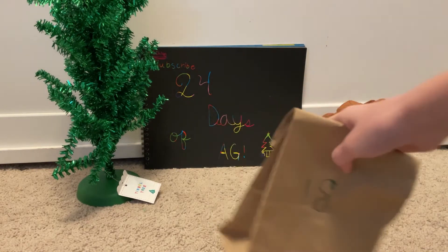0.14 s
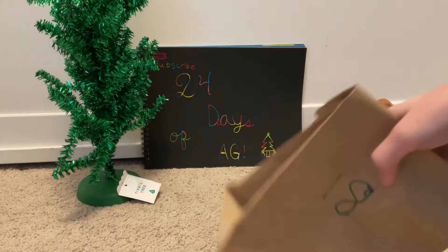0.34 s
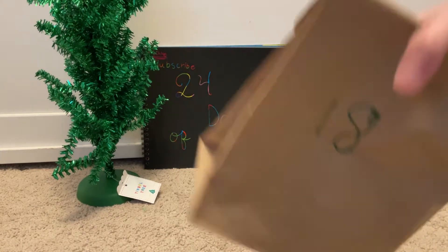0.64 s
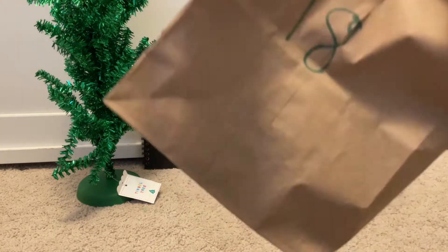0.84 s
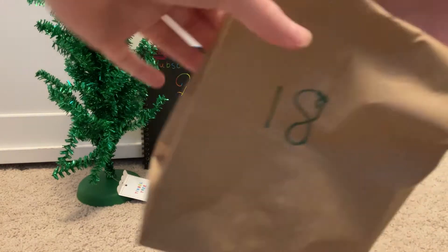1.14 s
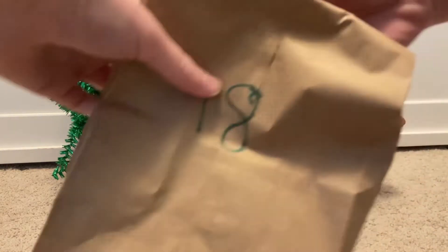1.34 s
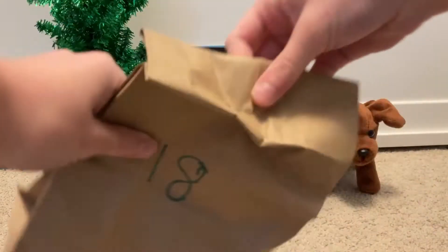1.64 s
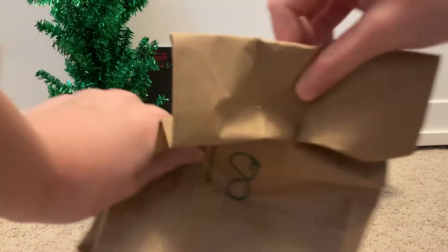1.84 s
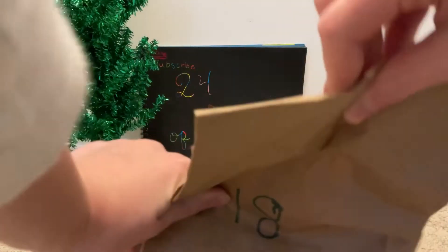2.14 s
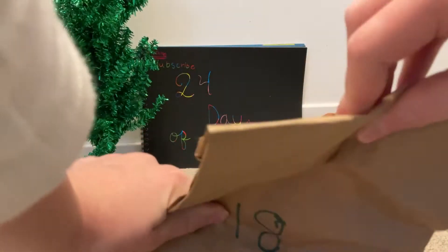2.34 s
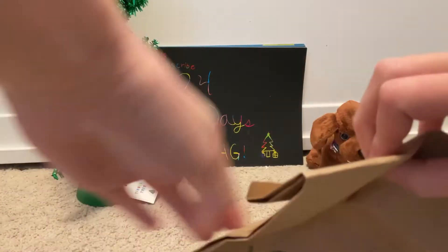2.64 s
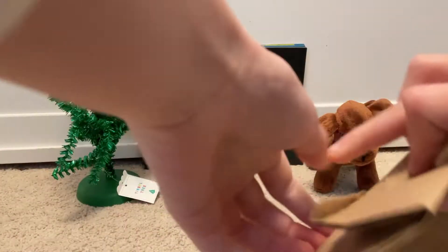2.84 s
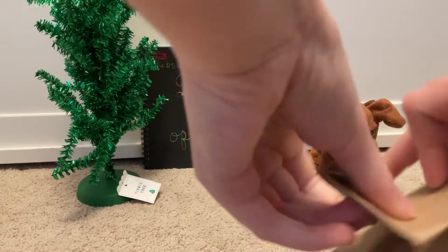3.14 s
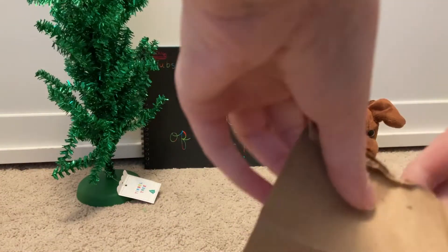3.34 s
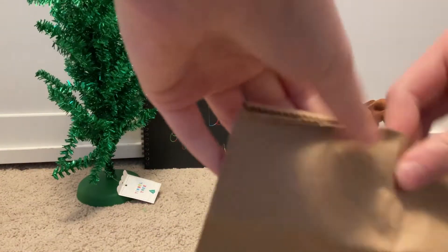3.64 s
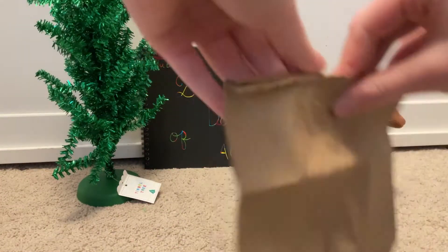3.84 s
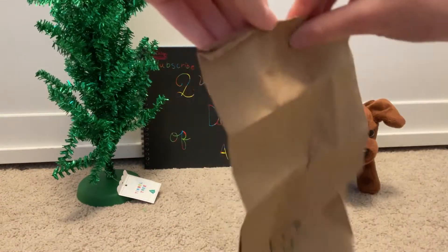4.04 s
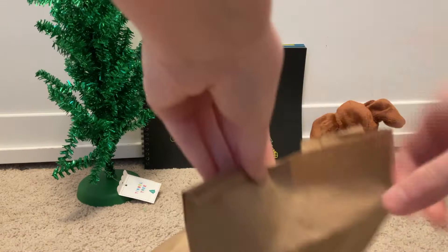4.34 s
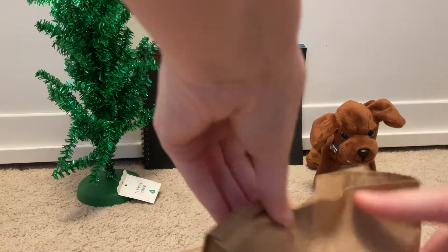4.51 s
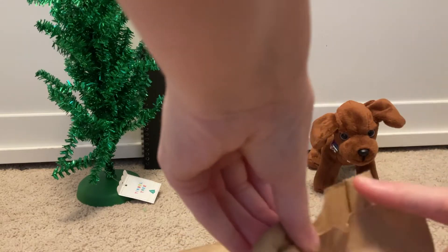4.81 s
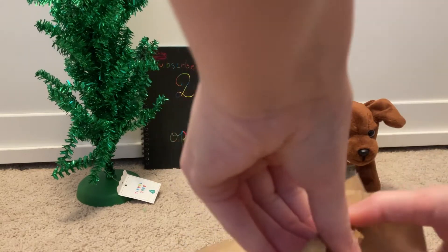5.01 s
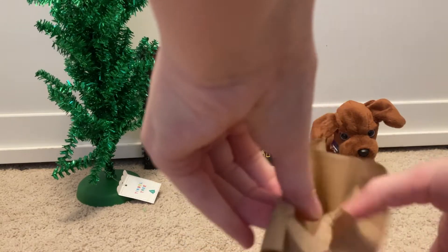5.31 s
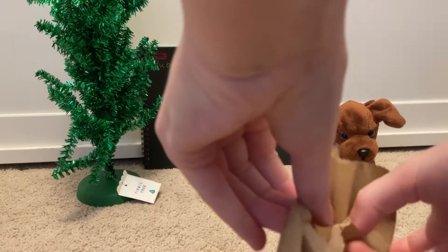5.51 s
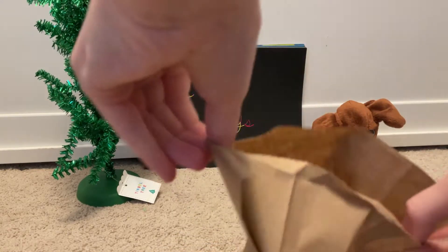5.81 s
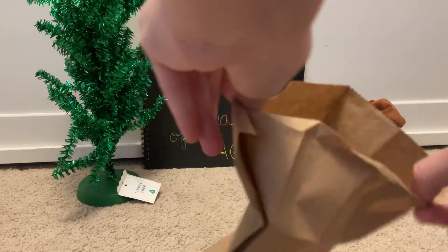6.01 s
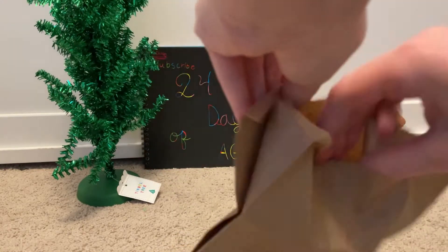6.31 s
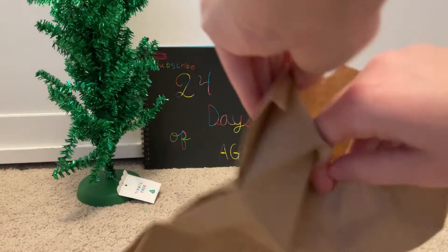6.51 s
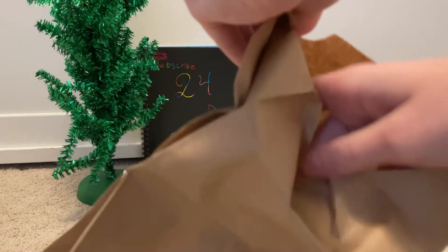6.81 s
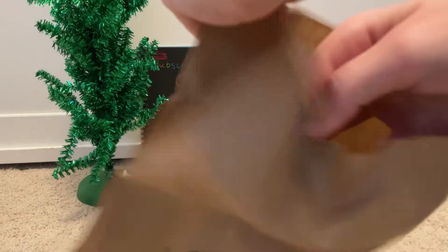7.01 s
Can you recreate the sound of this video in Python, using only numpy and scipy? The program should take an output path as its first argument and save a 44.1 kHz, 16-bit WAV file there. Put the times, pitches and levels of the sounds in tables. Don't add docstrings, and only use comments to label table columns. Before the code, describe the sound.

A stiff paper bag is handled very close to a phone microphone in a quiet carpeted room, dry and mono. From 0 to 0.8 s there are light ticks, faint rustling and a few dull, hollow panel thumps around 0.5 s. Crisp creases begin near 0.85 s and thicken from 1.25 s into dense, uneven crackling with bright, sizzling edges. The loudest snap, with a low papery thud, lands at about 2.03 s. Crackles thin through 2.2-2.8 s. From 3 to 4.3 s come scattered ticks and small clusters, then a brisk rustling burst around 4.5 s. After a near-quiet gap, sparse crinkles return from 4.9 to 6 s. A sharp snap at 6.35 s leads into a final lively run of crackling from 6.55 s to the end, just past 7 s. The room tail is short and dull, with barely perceptible hiss underneath.

```python
import sys
import numpy as np
from scipy import signal
from scipy.fft import rfft, irfft
from scipy.io import wavfile
from scipy.ndimage import uniform_filter1d

SR = 44100
rng = np.random.default_rng(int(sys.argv[2]) if len(sys.argv) > 2 else 0)


def invert_db(x):
    u = np.asarray(x, float) / 20
    return 10 ** u


def to_wav(s):
    ch = np.atleast_2d(s).T
    pcm = np.round(np.clip(ch, -1, 1) * 32767)
    wavfile.write(sys.argv[1], SR, pcm.astype(np.int16))


N = 315932

# (time [s], rustle level [dB], panel wobble level [dB], finger rub hiss level [dB])
HANDLING = [(0.0, -44.5, -44, -47), (0.37, -41, -43, -50), (0.52, -53, -46.5, -72),
            (0.66, -43.5, -43.5, -55), (0.79, -65, -56.5, -79), (0.85, -44.5, -40.5, -61),
            (0.92, -32, -37.5, -53), (1.118, -54.5, -46.5, -60), (1.26, -34, -34, -43),
            (1.38, -31, -30, -49), (1.5, -36.5, -42.5, -40), (1.56, -26, -30.5, -31), (1.65, -37, -38, -51),
            (1.76, -27.5, -31, -29), (1.82, -46, -38, -52), (1.88, -30, -34.5, -47),
            (1.971, -52.5, -56.5, -64.5), (2.04, -22.5, -32, -20), (2.1, -50.5, -51.5, -72),
            (2.15, -55.5, -54.5, -56), (2.27, -45.5, -38, -51), (2.349, -49.5, -47.5, -50),
            (2.429, -28, -34, -32), (2.49, -46.5, -50, -54), (2.55, -53, -50.5, -50), (2.74, -47, -52, -49),
            (2.79, -34, -38, -41), (2.89, -46.5, -51.5, -46), (3.23, -38, -39, -38.5),
            (3.37, -52.5, -52.5, -58.5), (3.62, -43.5, -42, -44), (3.7, -48, -55, -53),
            (3.79, -48, -47, -57), (4.01, -60, -66.5, -50.5), (4.1, -45, -49, -39), (4.19, -55.5, -60, -58),
            (4.33, -53.5, -50.5, -52), (4.48, -25.5, -37.5, -32.5), (4.69, -52, -56, -53.5),
            (5.05, -37, -41, -38.5), (5.27, -41.5, -47.5, -42.5), (5.41, -56, -55, -55.5),
            (5.65, -35, -41, -40.5), (5.84, -56, -50.5, -55), (5.909, -40, -40.5, -43),
            (6.1, -53, -49, -70), (6.21, -47, -50.5, -49), (6.28, -30.5, -35.5, -37),
            (6.53, -40, -44.5, -37.5), (6.59, -26.5, -38, -42), (6.66, -45.5, -47, -37),
            (6.708, -26.5, -31, -38), (6.89, -42.5, -41.5, -41.5), (6.989, -27.5, -34, -29),
            (7.09, -44, -41.5, -56), (7.16, -39.5, -39.5, -41)]
TRAVEL_MS_AT_1K = 1.5


def rms_one(x):
    return x / np.sqrt(np.mean(x ** 2, axis=-1, keepdims=True) + 1e-20)


def band(x, low_hz, high_hz):
    sos = signal.butter(1, [low_hz, high_hz], "band", fs=SR, output="sos")
    return signal.sosfilt(sos, x)


def drift(rate_hz):
    r = np.exp(-2 * np.pi * rate_hz / SR)
    wander = signal.lfilter([1], [1, -2 * r, r * r], rng.standard_normal(N + SR))
    return rms_one(wander[SR:])


def resonance(hz, centre_hz, damping):
    return 1 / (1 + 1j * damping * (hz / centre_hz - centre_hz / hz))


def paper_gain(hz):
    # (frequency [Hz], level per Hz [dB])
    paper = np.array([(24, -51), (40, -27), (71, -14.5), (245, 1), (300, -0.5), (449, 1), (4230, -3),
                      (9720, -9.5), (14900, -2), (16500, 1)])
    return invert_db(np.interp(np.log(hz + 1), np.log(paper[:, 0]), paper[:, 1]))


def travel(hz, ms_at_1k):
    return np.exp(-4j * np.pi * ms_at_1k / 1000 * np.sqrt(1000 * hz))


def loudest(bursts):
    power = uniform_filter1d(bursts ** 2, size=88, axis=1)
    return np.sqrt(power.max(axis=1)), power.argmax(axis=1)


def lay(bursts, times, level_db):
    out = np.zeros(N + bursts.shape[1])
    first = np.maximum(times * SR, 0).astype(int)
    at = first[:, None] + np.arange(bursts.shape[1])
    gain = invert_db(level_db) / loudest(bursts)[0]
    np.add.at(out, at, bursts * gain[:, None])
    return out[:N]


def snaps(size=4096, lead=512):
    # (time [s], level [dB], ringing [Hz], sizzle above 8 kHz
    # re level [dB], panel thud re level [dB], length [ms])
    crease_rows = [(0.2686, -21.5, 2310, -13, -13.5, 17), (0.8538, -16, 3640, -1, -7.5, 4.5),
                   (0.9391, -17, 1520, -12, -12, 3.1), (0.9565, -17, 1100, -10, -8, 3.7),
                   (1.0638, -26.5, 910, -10, -1, 9.9), (1.2504, -15.5, 4930, -1, -22, 4.2),
                   (1.34, -12.5, 5260, -4, -10.5, 5.3), (1.37, -14, 3350, -11, -6, 5.2),
                   (1.3768, -11, 4140, -10, -9, 4.1), (1.4032, -10, 996, -21, -21, 7.3),
                   (1.5345, -31, 4140, 8, -22, 1.6), (1.5522, -21.5, 4140, 11.5, -18, 2.5),
                   (1.5632, -16, 3890, -6, -14, 4), (1.6114, -16, 4500, -6, -32, 7.7),
                   (1.6779, -16.5, 6150, 4, -20, 1.5), (1.7153, -13.5, 1410, -6, -23, 4.3),
                   (1.7608, -15.5, 3570, 0.5, -7, 2.2), (1.7687, -9.5, 1370, -26, -21, 2.1),
                   (1.7925, -13.5, 5440, -14, -13, 1.8), (1.799, -14.5, 4400, 0, -10, 4.1),
                   (1.844, -16, 1180, -8, -8, 4.1), (1.87, -14, 5220, -8, -39, 2.3),
                   (1.8817, -21, 1440, 1, -23, 4.7), (1.945, -22.5, 2570, -18, -8.5, 1.1),
                   (1.9935, -18.5, 2900, 0, -41, 2.1), (2.0157, -17, 1880, -4, -14, 4.3),
                   (2.03, -4.5, 850, -2, -8.5, 7.2), (2.0384, -6.5, 3800, -3, -4, 4.7),
                   (2.2105, -22.5, 1240, -30, -5.5, 3.6), (2.241, -13, 4650, -7, -15, 3.8),
                   (2.2905, -15.5, 850, -21, -15.5, 4.7), (2.301, -21, 1670, -5, -14, 6.4),
                   (2.3425, -17, 4770, -1, -9.5, 7), (2.4073, -18.5, 4900, 6, -11, 4.8),
                   (2.426, -21, 4600, -16, -10, 4.8), (2.4423, -21.5, 1370, -12, -12, 5.9),
                   (2.4527, -17, 5800, -5, -19, 6.4), (2.5876, -18, 2420, 2.5, -15.5, 9.5),
                   (2.6918, -16.5, 4320, -3, -26, 2.7), (2.7828, -19, 2440, -9, -12, 1.1),
                   (2.7994, -19, 2300, -5, -4.5, 2.4), (2.9892, -21, 3570, 3, -17, 3.3),
                   (3.1412, -21.5, 4170, 2, -27, 1.7), (3.3097, -19, 1220, 5, -8, 7.4),
                   (3.6291, -15.5, 5230, 12, -11, 0.8), (3.642, -17, 4900, 0, -16, 2.8),
                   (3.7063, -23, 2950, 3.5, -28, 2.9), (3.7547, -14, 4170, -8, -20, 2.6),
                   (3.7828, -19, 4630, -6, -30, 3.6), (3.794, -21, 4100, -4, -10.5, 3.6),
                   (3.8133, -20, 5200, 8, -14, 1.5), (4.3552, -14.5, 6000, -10, -15.5, 2.1),
                   (4.4625, -24, 1970, 6, -4, 1.8), (4.4764, -22, 1880, -4, -25, 5.2),
                   (4.4881, -17.5, 1370, 7, -12, 3.7), (4.5029, -14.5, 1820, -2, -13, 2.6),
                   (4.568, -16.5, 2876, -6, -7.5, 5.2), (4.575, -11.5, 2720, -6, -20, 5.1),
                   (4.913, -22, 3020, -11, -10.5, 13), (5.2313, -27, 3040, -20, -13, 3.2),
                   (5.2439, -17.5, 3970, -7, -16, 4.1), (5.2692, -19, 4200, 1, -30, 3.7),
                   (5.6179, -15.5, 2200, 2.5, -15, 5.5), (5.6404, -17, 2090, -3, -8.5, 11),
                   (5.6484, -15, 2000, -7, -12, 2.7), (5.6643, -19, 1820, -11, -7.5, 4.8),
                   (5.8074, -24, 2630, -40, -5, 3.3), (5.908, -20, 1850, -3, -26, 3),
                   (5.9932, -24.5, 2200, -24, -34, 2.1), (6.0119, -16.5, 2440, -20, -12.5, 3.6),
                   (6.2671, -19, 3920, -24, -13, 8.3), (6.307, -17.5, 4400, -21, -22, 2.4),
                   (6.3556, -9.5, 3650, -10.5, -15, 1.8), (6.4118, -20.5, 1780, -7, -7.5, 7.9),
                   (6.5493, -18.5, 1440, -29, -16, 4.3), (6.5622, -22, 1980, -7, -11, 9),
                   (6.5815, -11.5, 4430, -5, -19, 1.6), (6.5903, -18, 2320, -2, -8, 4.1),
                   (6.6007, -12.5, 2740, -7, -6, 6.2), (6.6786, -14.5, 2200, -2, -13, 5.5),
                   (6.6942, -11, 4100, -8, -10, 10), (6.7056, -10, 4350, -6, -10, 6.4),
                   (6.717, -12, 2420, 2, -8, 6.2), (6.7309, -17, 2090, -1, -14, 6.5),
                   (6.8252, -14.5, 1870, -12, -7, 3.6), (6.8322, -14, 5300, -4, -21, 5.7),
                   (6.864, -12, 2200, -18, -9.5, 2.6), (6.9679, -15.5, 2597, 6.5, -3, 5),
                   (7.01, -8.5, 4900, -4, -13, 3.8), (7.0153, -13, 1430, -4, -8, 4.6),
                   (7.044, -9, 4350, -3, -12.5, 2), (7.0938, -17, 1290, -17, -4, 6.5)]
    more_crease_rows = [
        (1.0159, -16, 3250, -13, -26, 2.4),
        (3.0305, -22, 3720, -4, -19, 1.9),
        (3.0393, -20, 7000, 4, -14, 1.4),
    ]
    creases = np.vstack([crease_rows, more_crease_rows, small_creases()])
    s, level_db, ring_hz, sizzle_db, thud_db, length_ms = creases.T[:, :, None]
    t, hz = (np.arange(size) - lead) / SR, np.fft.rfftfreq(size, 1 / SR) + 1

    uneven = invert_db(4.6 * rng.standard_normal((len(s), size // 16)).repeat(16, axis=1))
    stage = t * 1000 / np.clip(length_ms, .6, 25)
    burst = invert_db(np.where(t < 0, -40, -14.0) * stage ** 2)
    murmur = invert_db(-16.5 - 60 * t / 0.055) * (t > 0) * (t < .07)
    needle = 4.5 * np.exp(-np.abs(t) / .00015)
    slips = rng.standard_normal((len(s), size)) * (uneven * (burst + murmur) + needle)

    push = rfft(slips) * paper_gain(hz) * travel(hz, TRAVEL_MS_AT_1K)
    ringing = resonance(hz, ring_hz, damping=2.8) + invert_db(-10)
    crack = irfft(push * ringing / (1 + (hz / 8500) ** 6) / (1 + (800 / hz) ** 4))
    sizzle = irfft(push / (1 + (8000 / hz) ** 6))
    thud = irfft(push * travel(hz, 1.232) / (1 + (hz / 800) ** 4))

    start = s[:, 0] - loudest(crack)[1] / SR
    level_db = level_db[:, 0]
    return (lay(crack, start, level_db - 3.0)
            + lay(sizzle, start, level_db + sizzle_db[:, 0] - 1.0)
            + lay(thud, start, level_db + thud_db[:, 0] - 4))


def small_creases():
    # (time [s], level [dB], ringing [Hz])
    ticks = [(0.0278, -28.5, 3380), (0.112, -19.5, 2290), (0.1418, -23, 1690), (0.1948, -20, 2880),
             (0.3809, -22, 2440), (0.3897, -25, 2330), (0.4982, -33, 2240), (0.577, -34, 3900),
             (0.6256, -30.5, 3180), (0.6412, -24.5, 4430), (0.717, -31.5, 3140), (0.8219, -20, 870),
             (0.8833, -25, 3900), (0.9481, -30, 3920), (1.16, -24, 2050), (1.2202, -20.5, 3530),
             (1.2404, -26, 4640), (1.2703, -22, 3350), (1.4642, -19.5, 2080), (1.5119, -18.5, 3780),
             (1.57, -21, 3720), (1.7451, -18, 1880), (1.862, -26, 3350), (1.89, -23, 4400),
             (1.899, -17.5, 2110), (2.0096, -24, 2460), (2.055, -28, 1980), (2.062, -24, 3180),
             (2.1719, -31, 3200), (2.2804, -27.5, 2440), (2.535, -24, 6050), (2.63, -28.5, 1000),
             (2.6696, -32, 1390), (2.753, -24.5, 4140), (2.7575, -23, 4140), (2.7744, -20, 2080),
             (2.8232, -26, 2200), (2.9066, -22.5, 4140), (2.9465, -25, 3350), (3.0573, -37, 2030),
             (3.0795, -39, 4020), (3.2304, -19.5, 1980), (3.2383, -19, 2100), (3.2454, -19, 3020),
             (3.2872, -27, 2090), (3.3906, -19.5, 1360), (3.477, -28.5, 1050), (3.497, -22, 3780),
             (3.5312, -20.5, 2400), (3.54, -22.5, 2290), (3.5735, -24, 1110), (3.5788, -21.5, 1670),
             (3.6017, -22.5, 1120), (3.6142, -28, 3720), (3.6346, -18, 1300), (3.6537, -22, 1110),
             (3.6613, -22.5, 5250), (3.7473, -23, 1110), (3.8351, -28, 1980), (3.9356, -32, 2210),
             (4.1332, -26.5, 3940), (4.1584, -29, 1230), (4.1837, -28.5, 880), (4.259, -21, 2070),
             (4.273, -27.5, 3680), (4.3933, -27, 4360), (4.403, -25.5, 5980), (4.4173, -22, 2580),
             (4.4488, -23, 1440), (4.868, -28.5, 3920), (5.0504, -24.5, 4360), (5.1142, -23, 4140),
             (5.1385, -23, 2580), (5.1769, -22, 3720), (5.3304, -28, 4600), (5.3472, -21, 4460),
             (5.5487, -30, 1230), (5.5763, -24, 5140), (5.7078, -22, 1520), (5.7453, -29, 1880),
             (5.786, -23.5, 2540), (5.882, -20, 2940), (5.9534, -28, 3770), (6.0635, -27, 1700),
             (6.149, -24, 3350), (6.1886, -29, 4140), (6.2356, -23.5, 2200), (6.255, -20, 4770),
             (6.2819, -16.5, 4100), (6.5727, -24, 1690), (6.752, -25, 1610), (6.777, -26, 1690),
             (6.8117, -20, 4600), (6.8188, -18, 2200), (6.8411, -17, 1690), (7.0518, -17.5, 3180),
             (7.1179, -26, 2320), (7.141, -20.5, 1760), (7.1583, -16, 4100)]
    s, level_db, ring_hz = np.transpose(ticks)
    at, rustle_db, wobble_db, rub_db = np.transpose(HANDLING)
    sizzle_db = np.interp(s, at, rub_db - rustle_db) - 3.5
    thud_db = np.interp(s, at, wobble_db - rustle_db) - 9
    length_ms = rng.uniform(1.8, 5.2, len(s))
    return np.transpose([s, level_db, ring_hz, sizzle_db, thud_db, length_ms])


def thumps(size=8192):
    # (time [s], level [dB], panel pitch [Hz])
    panel_flips = [(0.503, -22.5, 102), (1.269, -35, 100), (1.369, -36, 100), (1.769, -43, 100),
                   (2.035, -18, 99), (3.305, -37, 106), (5.637, -24, 100), (6.962, -29, 103),
                   (7.088, -27, 96.5), (0.481, -23.5, 367), (0.497, -24, 296), (0.55, -20, 323),
                   (0.558, -28, 111)]
    s, level_db, panel_hz = np.transpose(panel_flips)[:, :, None]
    t, hz = np.arange(size) / SR, np.fft.rfftfreq(size, 1 / SR) + 1
    fade = invert_db(-60 * t * panel_hz / 1.3) * (t < .05)
    push = rng.standard_normal((len(s), size)) * fade
    panel = resonance(hz, panel_hz, damping=2.0) ** 2
    flip = irfft(rfft(push) * panel * travel(hz, 1.67))
    return lay(flip, s[:, 0] - .003, level_db[:, 0] - 9.0)


def rustle():
    s, *levels = np.transpose(HANDLING)
    t = np.arange(N) / SR
    rustle_db, wobble_db, rub_db = [np.interp(t, s, level) for level in levels]
    hz = np.fft.rfftfreq(N, 1 / SR) + 1

    sliding = .55 * rng.standard_normal(N) * invert_db(4 * drift(20))
    sheet = rfft(sliding)
    for crease_hz in (1100, 2400, 5200):
        crinkle = grains(per_s=110, spread_db=4.0, clump_db=6.0, t60=11.7 / crease_hz + 0.002)
        sheet = sheet + rfft(crinkle) * (invert_db(-10.5) + resonance(hz, crease_hz, damping=1.66))
    sheet = sheet * paper_gain(hz) * travel(hz, TRAVEL_MS_AT_1K)

    low = 1 / (1 + (hz / 850) ** 4)
    high = 1 / (1 + (7800 / hz) ** 6)
    return (invert_db(rustle_db + 1.5) * rms_one(irfft(sheet * (1 - low - high), N))
            + invert_db(wobble_db - 1.5) * rms_one(irfft(sheet * low, N))
            + invert_db(rub_db - 1.0) * rms_one(irfft(sheet * high, N)))


def grains(per_s, spread_db, clump_db, t60):
    born = rng.random(N) < per_s * invert_db(clump_db * drift(25)) / SR
    sizes = invert_db(spread_db * np.minimum(rng.exponential(1, N), 4))
    r = invert_db(-60 / (t60 * SR))
    fade = signal.lfilter([1], [1, -2 * r, r * r], born * sizes + 1e-9)
    return rms_one(fade * rng.standard_normal(N))


def room(x):
    t60_s, level_db = 0.043, -27
    t = np.arange(SR // 4) / SR
    fade = invert_db(-60 * t / t60_s) * (t > .004)
    tail = band(rng.standard_normal(len(t)), 225, 4000) * fade
    return invert_db(level_db) * signal.fftconvolve(x, tail / np.sqrt(np.sum(tail ** 2)))[:N]


def microphone_hiss():
    return invert_db(-91) * rms_one(band(rng.standard_normal(N), 200, .45 * SR))


def scene():
    bag = snaps() + thumps() + rustle()
    return (bag + room(bag) + microphone_hiss())[None]


def low_pass(x):
    return signal.sosfilt(signal.butter(12, 16980, fs=SR, output="sos"), x)


def record(dry):
    cutoff_hz = 16000
    rounded = .95 * np.tanh(dry / .95)
    first_cut = signal.cheby2(16, 30, cutoff_hz + 50, fs=SR, output="sos")
    second_cut = signal.cheby2(14, 45, cutoff_hz + 1050, fs=SR, output="sos")
    mix = signal.sosfilt(second_cut, signal.sosfilt(first_cut, rounded))
    return low_pass(mix)


dry = scene()
out = record(dry)
to_wav(out)
```